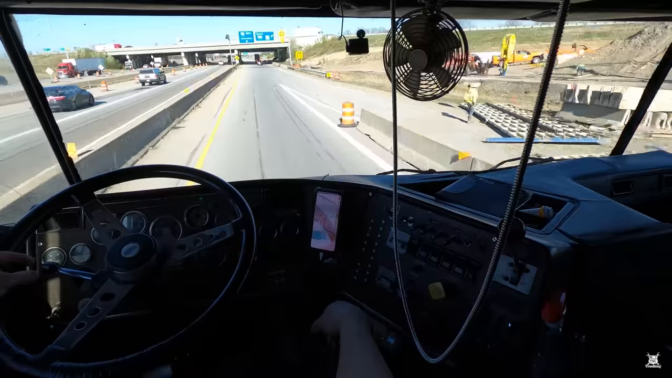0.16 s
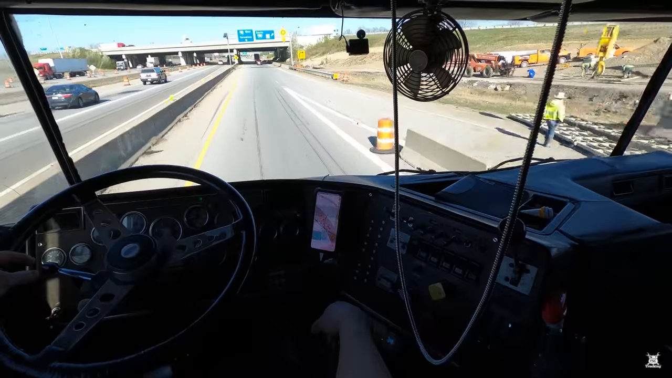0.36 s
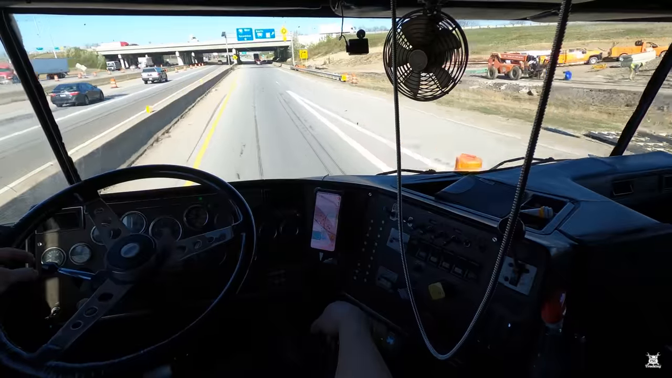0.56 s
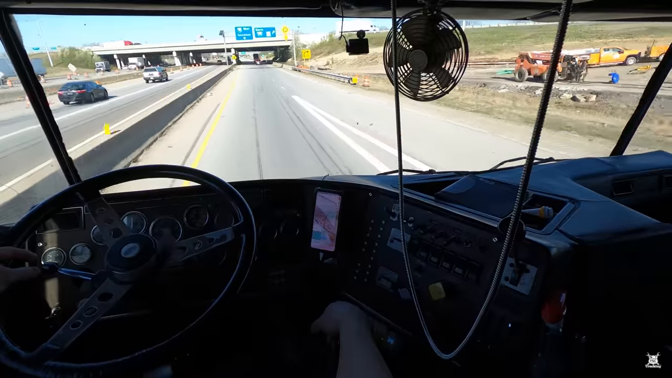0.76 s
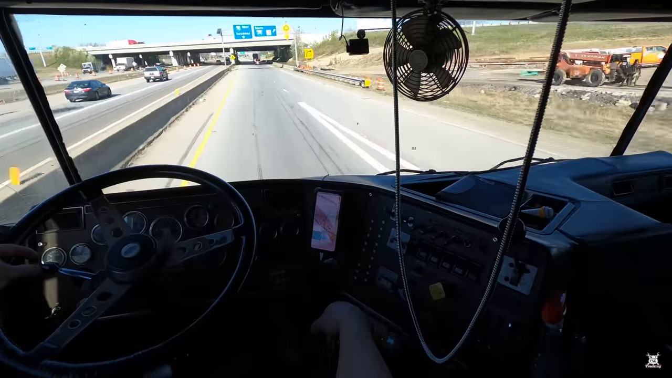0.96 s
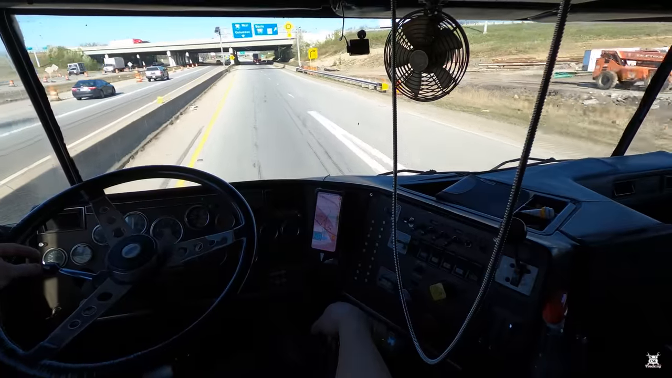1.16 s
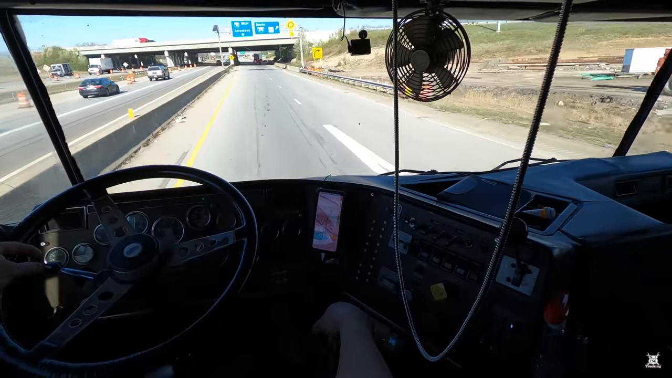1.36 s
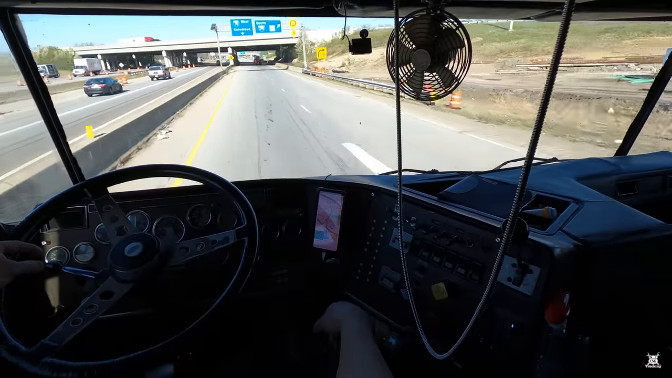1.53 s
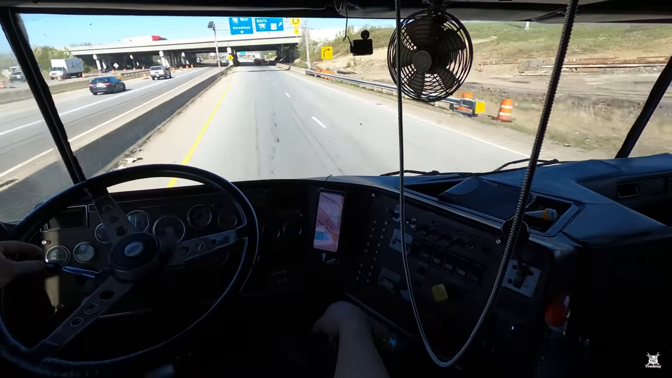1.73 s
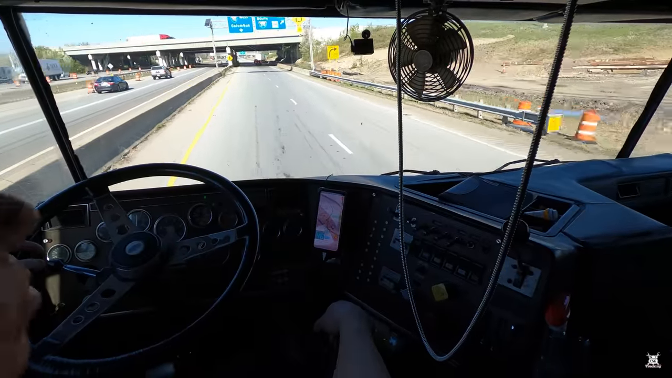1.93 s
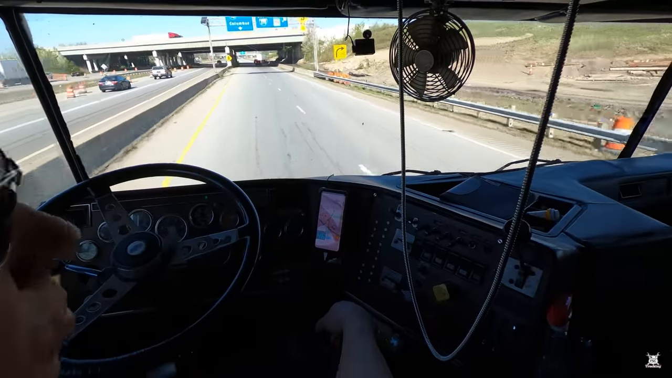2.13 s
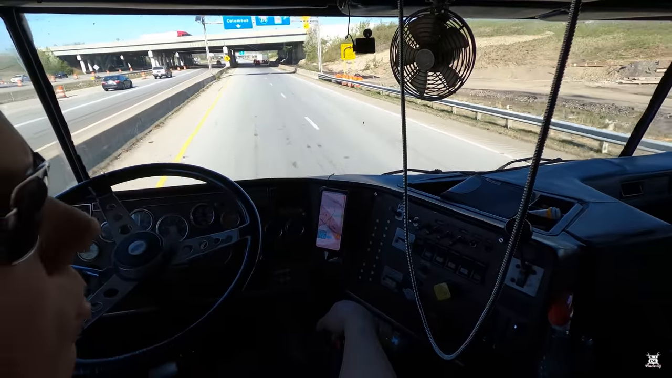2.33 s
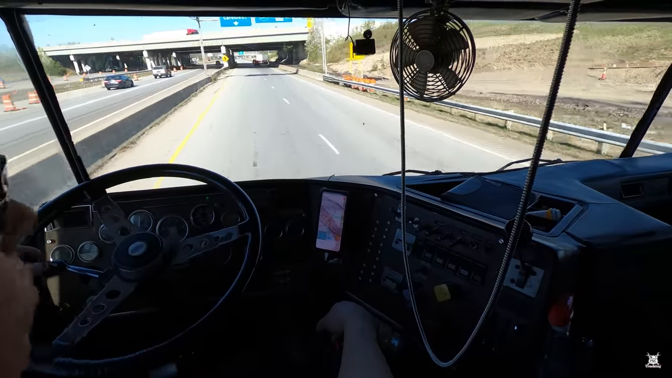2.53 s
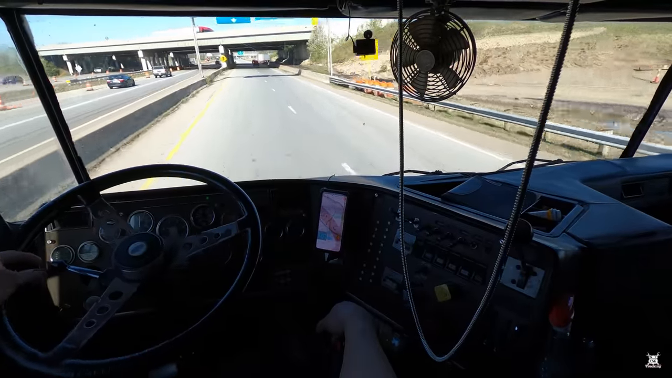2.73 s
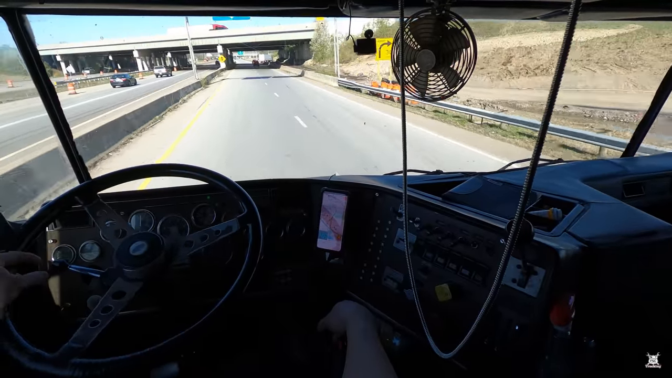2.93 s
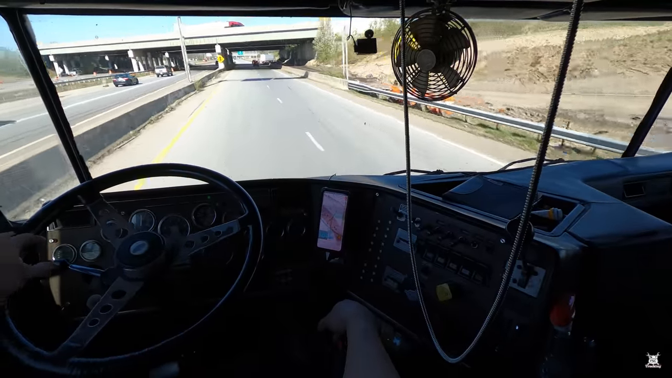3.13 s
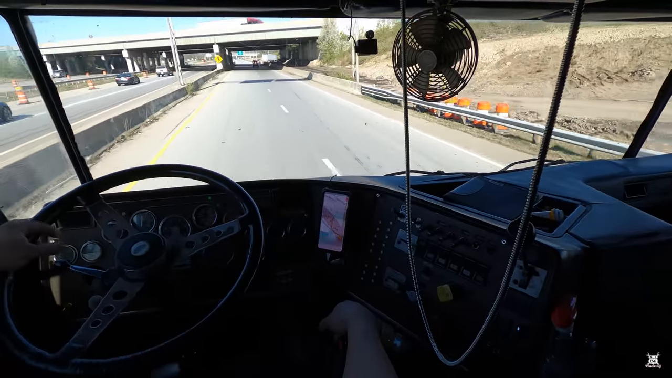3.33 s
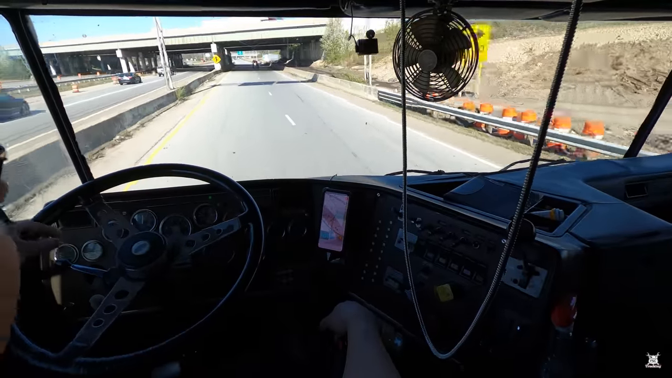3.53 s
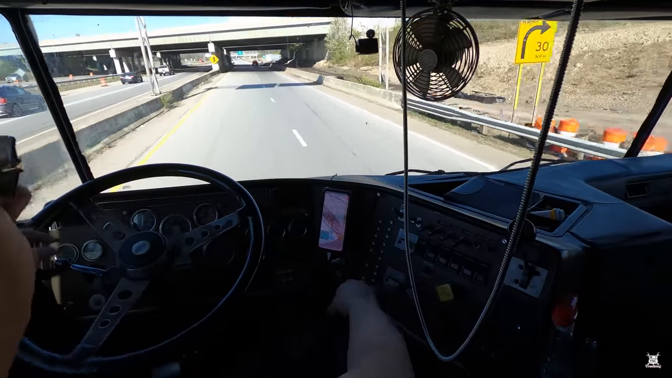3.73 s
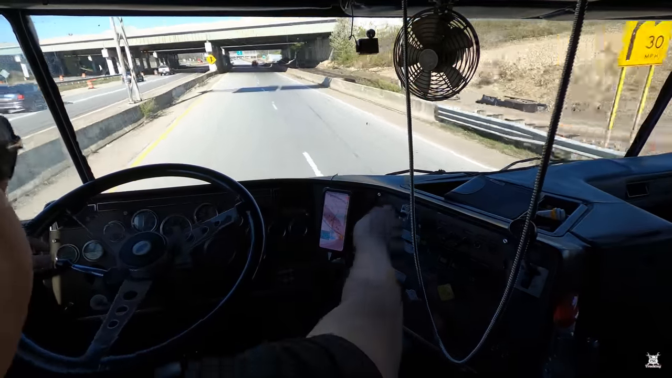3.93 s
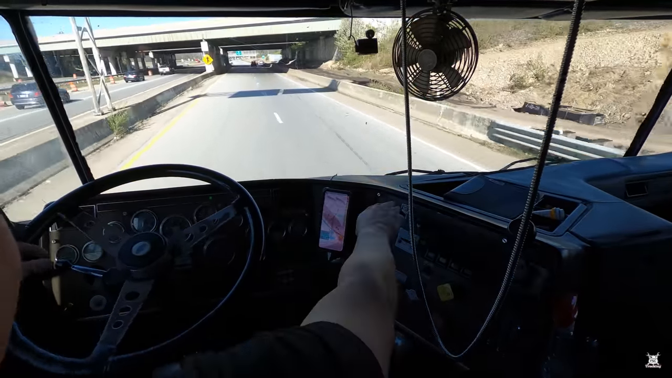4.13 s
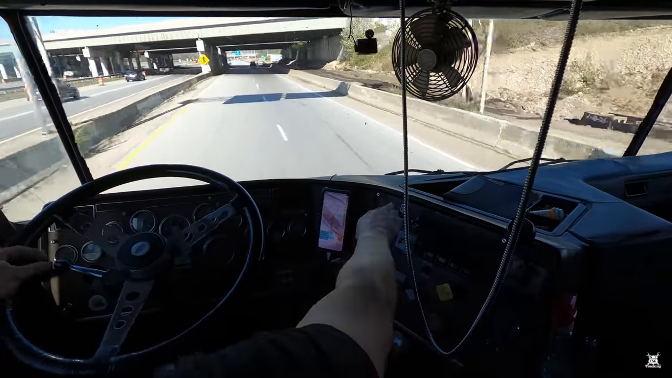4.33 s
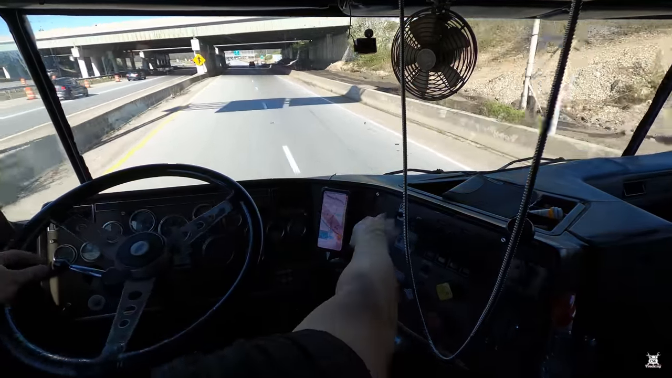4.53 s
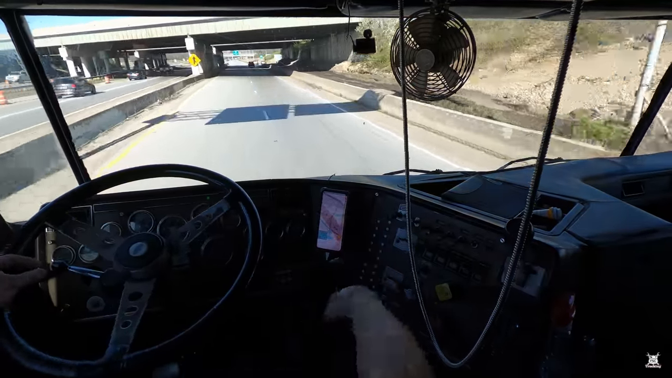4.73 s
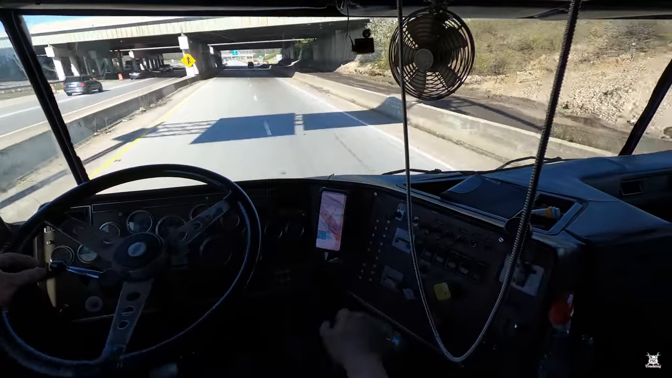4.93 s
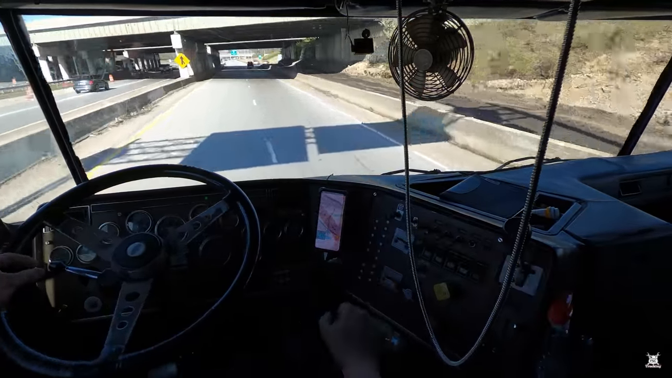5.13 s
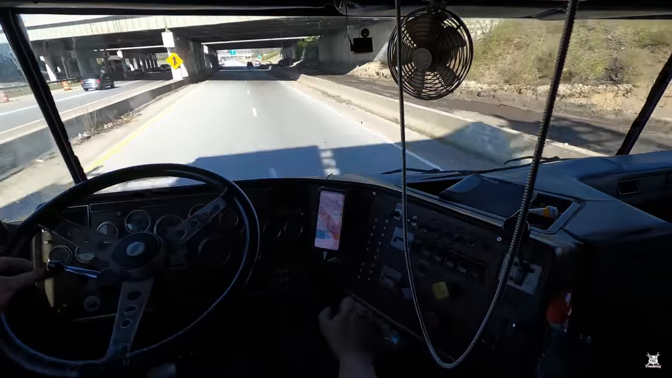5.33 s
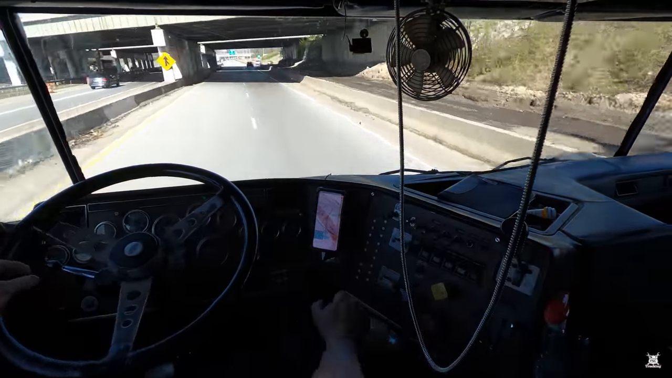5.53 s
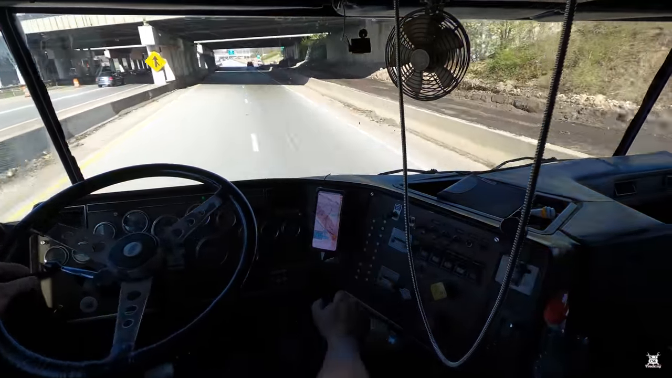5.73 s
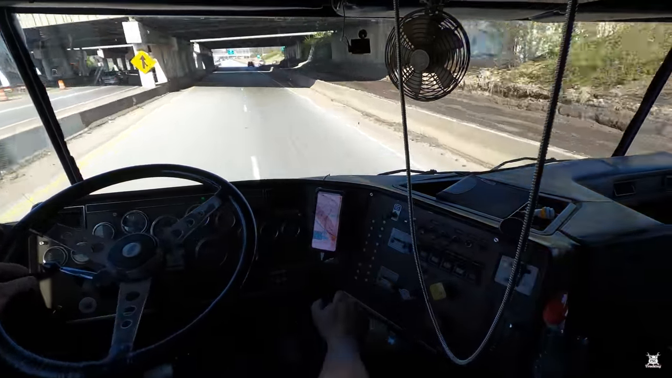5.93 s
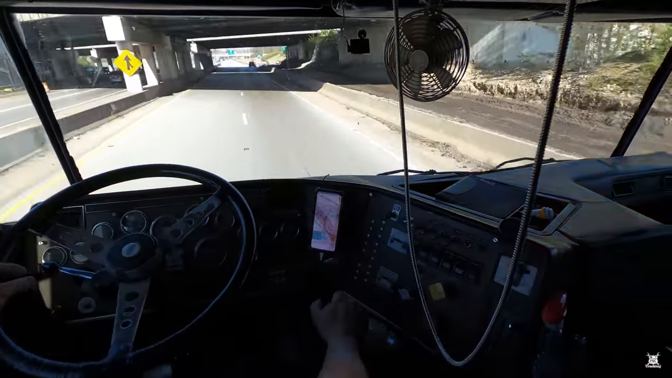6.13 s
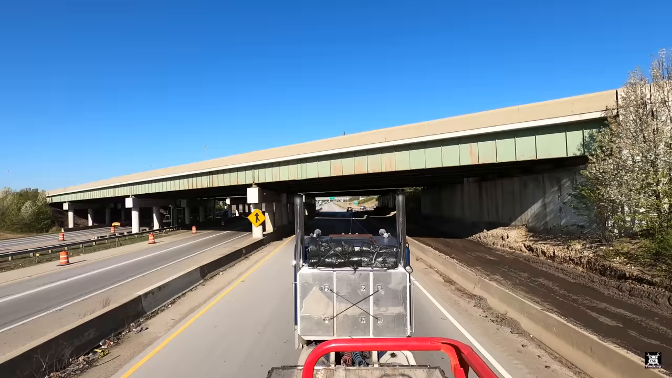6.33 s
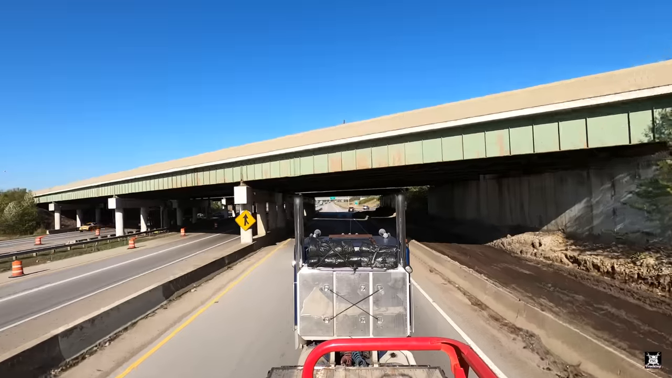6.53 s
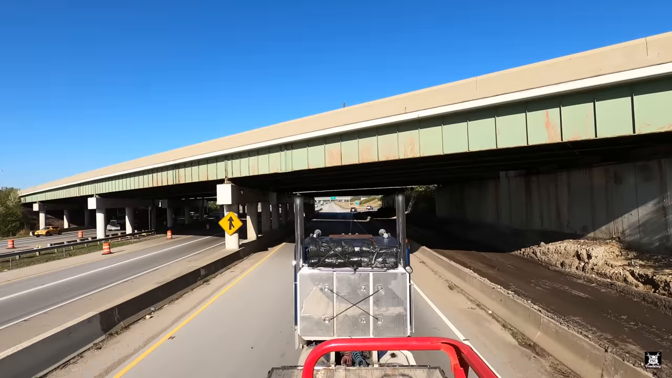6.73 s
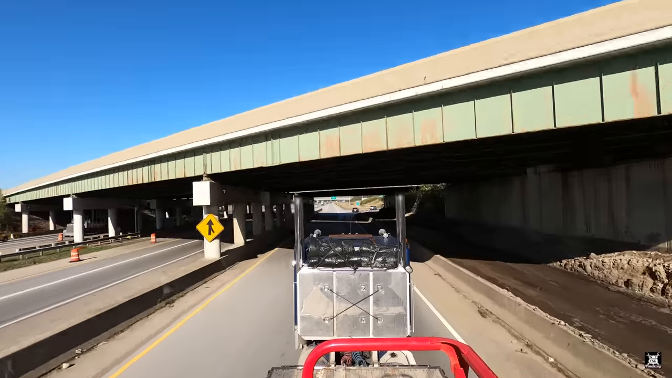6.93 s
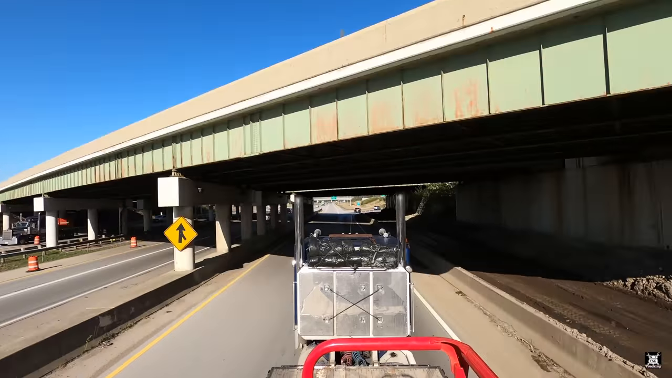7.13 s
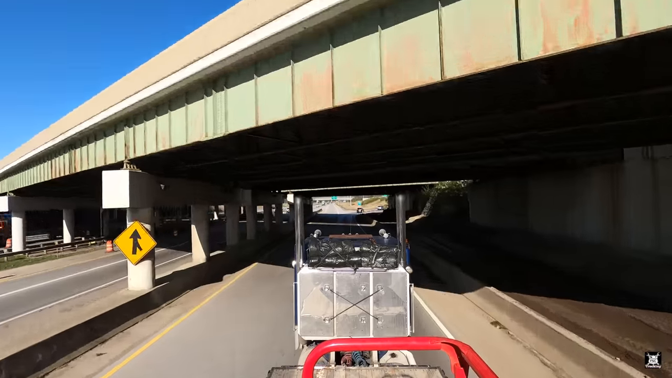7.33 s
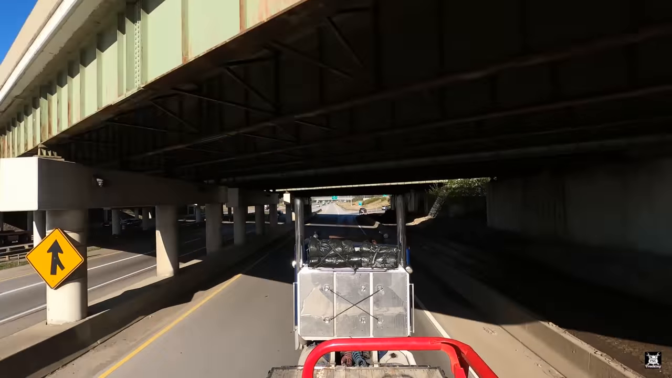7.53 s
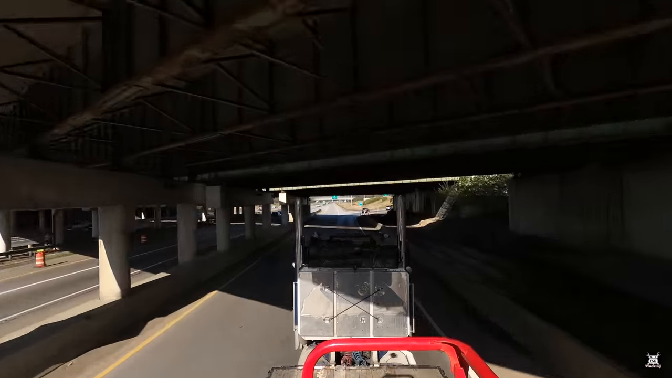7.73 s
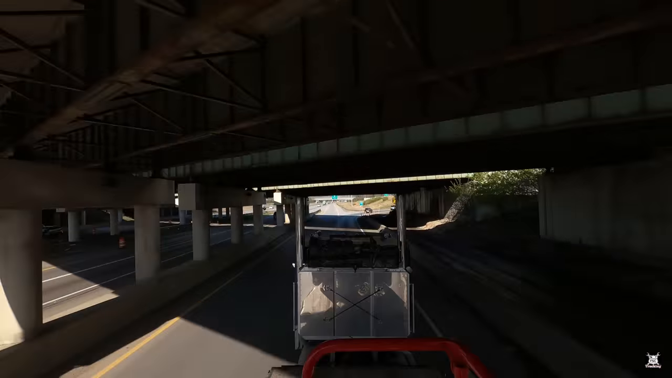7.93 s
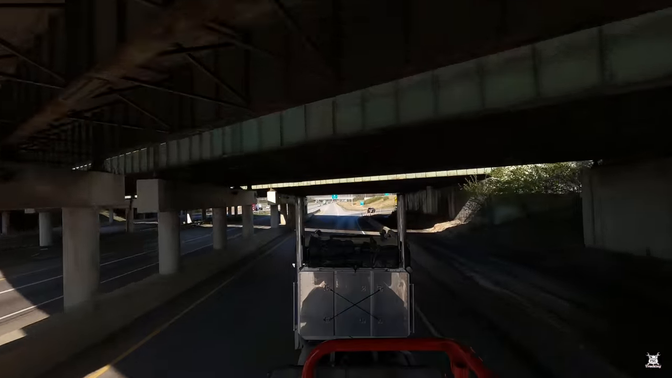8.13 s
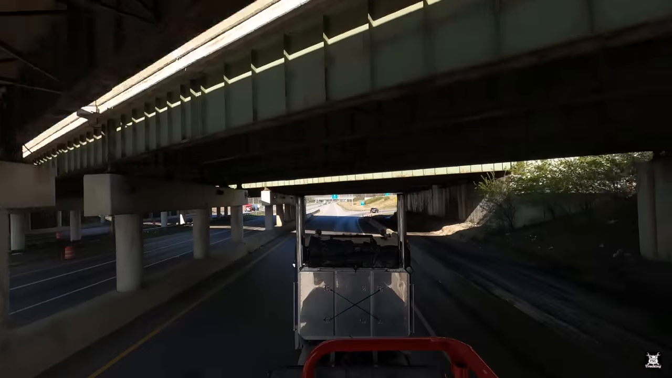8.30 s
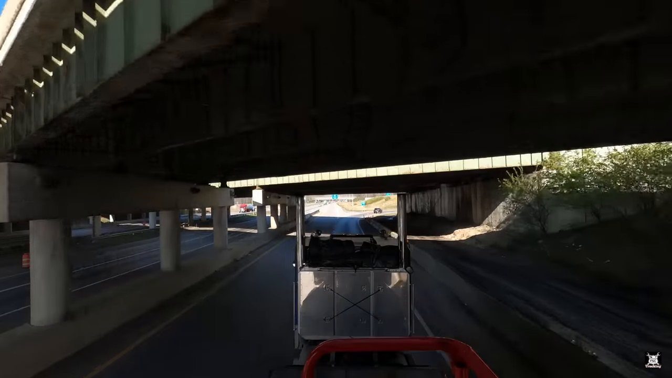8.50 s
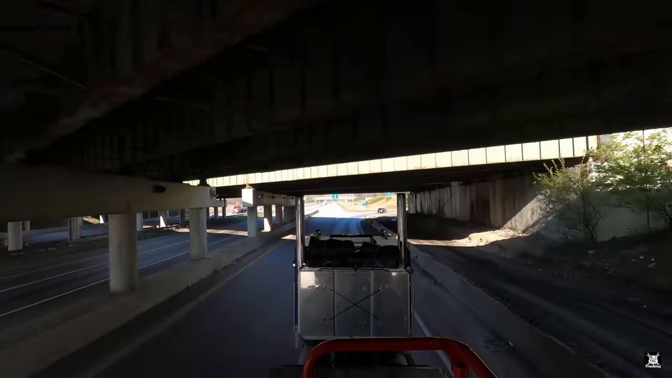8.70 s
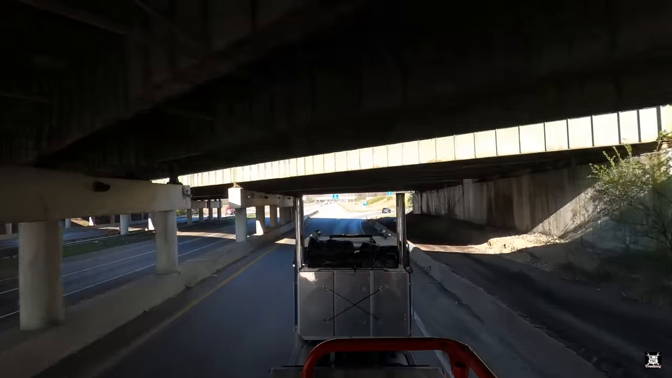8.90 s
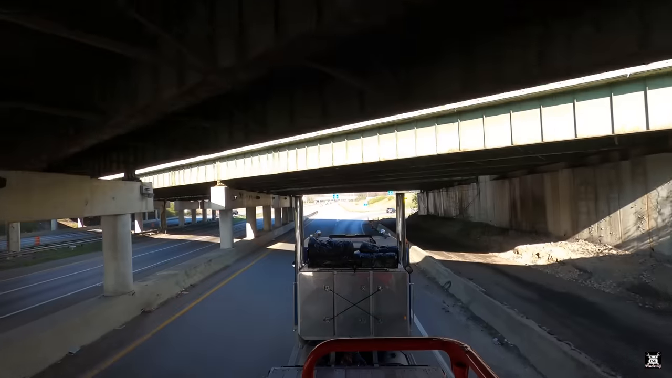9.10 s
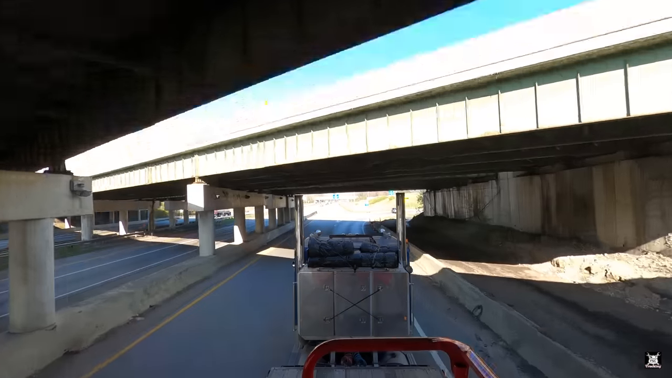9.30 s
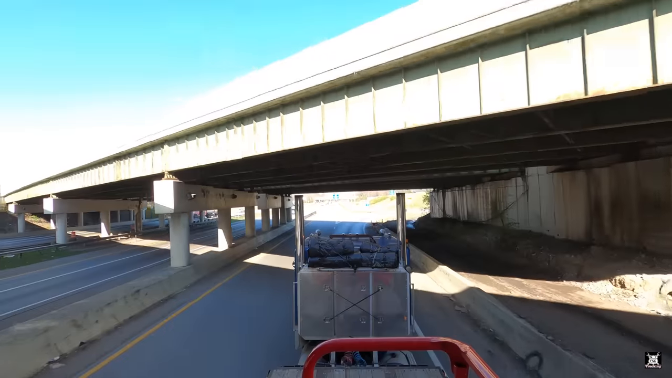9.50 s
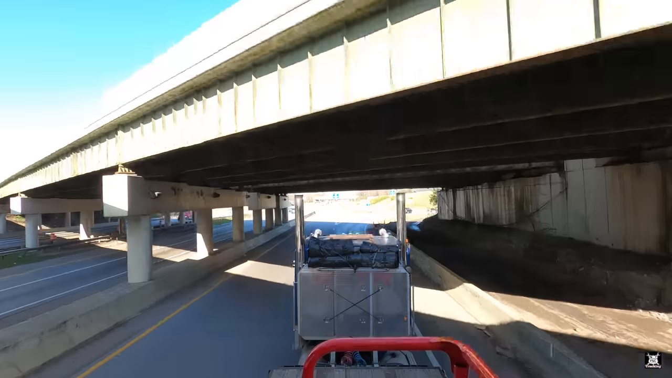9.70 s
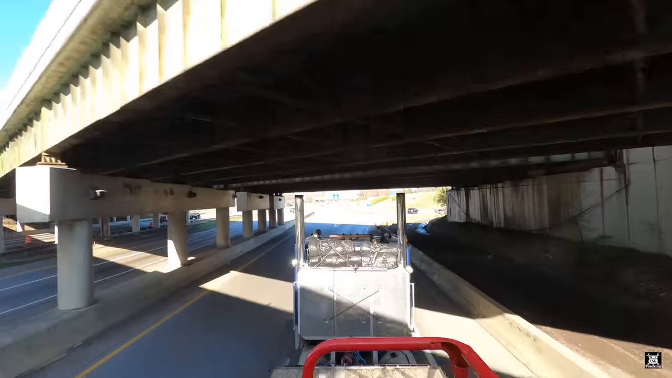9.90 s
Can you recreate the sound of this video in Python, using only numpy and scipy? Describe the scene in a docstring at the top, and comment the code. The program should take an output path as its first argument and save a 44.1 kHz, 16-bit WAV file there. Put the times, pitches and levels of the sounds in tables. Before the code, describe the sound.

A heavy diesel truck is heard from inside the cab, droning on its engine brake and slowly sinking in pitch over road noise, with a couple of faint knocks around 3 seconds. At 4.5 seconds a switch clicks twice and the braking ends with a soft thump. The engine drops lower and air hisses briefly at about 4.9 seconds for a gear change. Around 5.5 seconds the clutch bites with a shudder and a short panel rattle, and the engine climbs in pitch until nearly 7 seconds with a faint intake whine. Between 6.5 and 7.5 seconds the sound fades over to an outside microphone and grows much louder, with wind gusts and one sharp click. It peaks at 7.5 seconds as the truck enters an underpass, where a steady, resonant exhaust drone, tyre roar and rushing air continue until about 10 seconds.

```python
"""Diesel truck changing gear

A six-cylinder truck slows on its engine brake, heard in the cab, where the exhaust harmonics slide
through standing waves. A switch clicks, the brake stops, air hisses for a gear change and the engine
pulls up again. The sound then fades over to a microphone outside, where wind buffets, tyres roar
and the exhaust drones under a bridge, loud enough to overload it."""
import sys
import numpy as np
from scipy import signal
from scipy.fft import rfft, irfft, next_fast_len
from scipy.io import wavfile
from scipy.ndimage import uniform_filter1d

SR = 44100
rng = np.random.default_rng(int(sys.argv[2]) if len(sys.argv) > 2 else 0)


def master(y):
    """Save y as 16-bit WAV."""
    cut = np.clip(np.atleast_2d(y).T, -1, 1)
    pcm = np.round(cut * 32767)  # scale
    wavfile.write(sys.argv[1], SR, pcm.astype(np.int16))


N = 439236
TIME = np.arange(N) / SR
STEP = 16
COARSE = np.arange(N // STEP + 2) * STEP / SR  # a slower clock for bass and control curves
CYLINDERS = 6
CLUTCH_FADE_S, BRIDGE_FADE_S = 0.067, 0.093

# the engine slows on its brake, drops for the shift, pulls up and sags: (time [s], firing rate [Hz])
FIRING_RATE = [(0, 74.57), (1, 72.3), (1.5, 70.8), (3, 67.13), (4, 64.83), (4.55, 63.5), (4.8, 58.96),
               (5.05, 54.8), (5.2, 57.8), (5.45, 61.37), (5.75, 70.25), (5.95, 73.64), (6.2, 79.55),
               (6.45, 83), (6.75, 85.2), (7, 83.6), (7.4, 83.78), (8.1, 82.22), (8.7, 81.88), (9.1, 81.44),
               (9.5, 80.62), (9.96, 79.8)]
# off the brake the engine coasts, runs free, pulls and eases: (time [s], load [dB])
ENGINE_LOAD = [(4.6, -17), (4.95, -13), (5.12, -28), (5.4, -19), (5.55, -11), (5.85, -13), (6.05, -6.5),
               (6.4, -3.5), (6.78, -0.5), (6.9, -21)]
# bridges overhead: (entry time [s], exit time [s])
BRIDGE_SPANS = [(7.5, 9.33), (9.74, 10.4)]


def gain_of(db):
    """Decibels to amplitude."""
    return 10 ** (np.asarray(db) / 20)


def unit_rms(x):
    """Normalises to rms 1."""
    return x / np.sqrt(np.mean(x ** 2) + 1e-20)


def follow(rows, t=TIME):
    """Linear interpolation of each column of a time table at the times t."""
    times, *columns = np.transpose(rows)
    return [np.interp(t, times, column) for column in columns]


def fine(curve):
    """Interpolates a coarse-clock curve to every sample."""
    return np.interp(TIME, COARSE, curve)


def spectrum(points, hz):
    """Interpolates a spectrum table on a log-frequency axis."""
    f, db = np.transpose(points)
    return np.interp(np.log(hz + 1), np.log(f + 1), db)


def bell(hz, centre, width):
    """Gaussian frequency band of height 1."""
    return np.exp(-.5 * ((hz - centre) / width) ** 2)


def resonance(hz, centre, width):
    """Lorentzian resonance peak of height 1."""
    return 1 / (1 + ((hz - centre) / width) ** 2)


def lift(bands, hz):
    """Gain [dB] of a set of peaks and dips at the frequency hz."""
    return sum(db * bell(hz, centre, width) for centre, width, db in bands)


def ramp(t, at, fade):
    """Linear rise from 0 to 1 over fade seconds, centred on the time at."""
    return np.clip((t - at) / fade + .5, 0, 1)


def swell(t, at, half_length):
    """Gaussian envelope, down to 1/e a half length from its peak."""
    return np.exp(-((t - at) / half_length) ** 2)


def noise(colour):
    """Noise of rms 1 with the amplitude spectrum colour(hz)."""
    size = next_fast_len(N, True)
    white = rfft(rng.standard_normal(size))
    return unit_rms(irfft(white * colour(np.fft.rfftfreq(size, 1 / SR)), size)[:N])


def drift(rate):
    """Random modulation of rms 1 on the coarse clock, changing about rate times a second."""
    smooth = signal.resample(rng.standard_normal(512), 4096)
    return unit_rms(np.interp(COARSE * rate, np.arange(4096) / 8, smooth))


def braking(t, off_s=4.59, fade=0.15):
    """1 while the engine brake is on, then 0."""
    return 1 - ramp(t, off_s, fade)


def coasting(t, throttle_s=6):
    """1 between the end of braking and the throttle."""
    return (1 - braking(t)) * (1 - ramp(t, throttle_s, CLUTCH_FADE_S))


def clutch(t, start_s=5.47, end_s=5.78):
    """1 while the clutch bites."""
    return ramp(t, start_s, CLUTCH_FADE_S) - ramp(t, end_s, CLUTCH_FADE_S)


def outside(t, midpoint_s=6.93, fade=.2):
    """Logistic crossfade from the cab (0) to the outside microphone (1)."""
    return 1 / (1 + np.exp((midpoint_s - t) / fade))


def bridge_face(t):
    """Reflection from the face of the first bridge, swelling to 1 as the truck passes."""
    return swell(t, at=7.47, half_length=0.073)


def underpass(t):
    """1 once the truck is between the walls of the underpass."""
    return ramp(t, BRIDGE_SPANS[0][0], BRIDGE_FADE_S)


def overhead(t):
    """1 while a bridge deck is above the truck."""
    return sum(ramp(t, enter, BRIDGE_FADE_S) - ramp(t, leave, BRIDGE_FADE_S)
               for enter, leave in BRIDGE_SPANS)


def firing_count(wobble=.001):
    """Phase is the integral of frequency: firings so far at a slightly wavering crank speed."""
    rate = follow(FIRING_RATE, COARSE)[0] * (1 + wobble * drift(9))
    return np.cumsum(rate) * STEP / SR


def lope(line, midway_db, other_db, octave_db):
    """Unequal cylinders add lines between the firing harmonics; their relative level [dB]."""
    if line % CYLINDERS == 0:
        return 0
    base_db = other_db if line % (CYLINDERS // 2) else midway_db
    return min(0, base_db + octave_db * np.log2(line / CYLINDERS))


def cab_level(line, rate, midway_db=8.5, shudder_db=13.5, bass_hz=133.7,
              lope_db_per_hz=0.97, lope_from_hz=69.85):
    """Standing waves in the cab raise or sink an engine harmonic as it slides through them [dB]."""
    # engine spectrum in the cab: (frequency [Hz], level [dB])
    drone = [(55, -35.5), (62, -26.5), (68, -25.5), (100, -25.5), (200, -32.5), (400, -34.5), (500, -50),
             (560, -47), (700, -51.5), (900, -56.5)]
    # standing waves of the cab: (frequency [Hz], width [Hz], gain [dB])
    standing_waves = [(109.2, 7.3, 9.5), (125, 2.4, -9.5), (134.2, 3.9, 7.5), (144.6, 1.3, -8),
                      (148, 1.1, 8.5), (174.35, 5.25, 14.5), (193.7, 6, 9.5), (235, 16, 3),
                      (290, 17.4, -5.5), (312.8, 10.8, 15), (333.6, 7, -6.5), (366.8, 11.1, 10.5),
                      (415, 4.7, 2), (429.5, 5.9, 10), (468.5, 5.7, 11.5)]
    # change of engine tone off the brake: (frequency [Hz], gain [dB])
    power_tone = [(60, 2), (85, -0.5), (112, -7.5), (130, -2), (150, 6), (160, 9.5), (168, 6), (175, 2.5),
                  (198, -6), (255, 1.5), (320, -13.5), (450, -6)]
    hz, brake = rate * line / CYLINDERS, braking(COARSE)
    bass = 1 / (1 + (hz / bass_hz) ** 8)
    midway = line % CYLINDERS == CYLINDERS // 2  # halfway between two firing harmonics
    power_db = follow(ENGINE_LOAD, COARSE)[0] + midway_db * midway * bass + spectrum(power_tone, hz)
    db = spectrum(drone, hz) + lift(standing_waves, hz)
    db += lope(line, midway_db=-17, other_db=-18.5, octave_db=3.55)
    db += (1 - brake) * power_db + clutch(COARSE) * shudder_db * bass
    if line % CYLINDERS:  # on the brake the lope grows with speed
        db += brake * lope_db_per_hz * (rate - lope_from_hz)
    return db


def outside_level(line, rate, walls_db=2.5, boom_lag_s=0.067):
    """Reflection and standing waves in the underpass reinforce an engine harmonic outside [dB]."""
    # engine spectrum outside: (frequency [Hz], level [dB])
    drone = [(60, -23), (82, -20.5), (97, -23), (120, -19.5), (124.5, -13.5), (136, -18.5), (200, -22.5),
             (325, -32), (375, -27.5), (430, -26), (520, -40), (700, -46.5), (900, -53.5)]
    # standing waves of the underpass: (frequency [Hz], width [Hz], gain [dB])
    standing_waves = [(171.3, 4.83, 16), (364.3, 16.7, 12), (551, 5, 14), (714, 16, 10)]
    # boom thrown back by the bridge face: (frequency [Hz], width [Hz], gain [dB])
    face_boom = [(125, 10, 6.8)]
    hz = rate * line / CYLINDERS
    db = spectrum(drone, hz) + lope(line, midway_db=-10.5, other_db=-15.5, octave_db=1.24)
    db += underpass(COARSE) * (walls_db + lift(standing_waves, hz))
    return db + bridge_face(COARSE - boom_lag_s) * lift(face_boom, hz)


def exhaust(firings, top_line=68, bark_lead=0.1364, blow_spread=1.2, lope_spread=1.0, uneven_db=1.37):
    """Six blows a cycle form a Fourier series; outside, reflections scatter its phases."""
    rate, outdoors = follow(FIRING_RATE, COARSE)[0], outside(COARSE)
    firing_waver, lope_waver = 0.021 + 0.099 * outdoors, .16 + .02 * outdoors
    sound = 0
    for line in range(CYLINDERS - 1, top_line + 1):
        if line % CYLINDERS:  # one cylinder barks hardest, bark_lead of a firing ahead of the beat
            bark = np.pi / 2 + 2 * np.pi * bark_lead * line / CYLINDERS
            phase = bark + (lope_spread + outdoors) * rng.standard_normal() + lope_waver * drift(7)
            unsteady = (1 + lope_waver * drift(8)) * gain_of(uneven_db * rng.standard_normal())
        else:  # firing harmonics align: a sharp pressure dip in the cab, a looser push outside
            phase = np.pi * (1 - outdoors) + (blow_spread + outdoors) * rng.uniform(-1.02, 1)
            unsteady = 1 + firing_waver * drift(14)
        cab_power = (1 - outdoors ** 2) * gain_of(cab_level(line, rate)) ** 2
        outside_power = outdoors ** 2 * gain_of(outside_level(line, rate)) ** 2
        amplitude = np.sqrt(2 * (cab_power + outside_power)) * unsteady
        sound += amplitude * np.cos(2 * np.pi * line * firings / CYLINDERS + phase)
    return signal.resample_poly(sound, STEP, 1, window=("kaiser", 10))[:N]


def rush_colour(hz, t):
    """Resonances filter the rush in the cab, tyre bands shape it outside; scaled by its 500-2000 Hz power
    averaged over all bins."""
    # noise in the cab on the brake: (frequency [Hz], level [dB])
    cab_braking = [(25, -9), (55, -3), (85, 3), (120, 8.5), (200, 8.5), (270, 7.5), (360, 9), (470, 7.5),
                   (600, 1.3), (800, -1.5), (1000, -7), (2000, -15), (3500, -25), (6000, -37), (11000, -50),
                   (12300, -54), (13500, -76)]
    # noise in the cab off the brake: (frequency [Hz], level [dB])
    cab_pulling = [(25, -10.5), (55, 1), (100, 14.5), (200, 11.5), (300, 13), (450, 7), (700, 3.5),
                   (1000, -6), (1500, -9.5), (2000, -12), (3500, -22.5), (6000, -36.5), (11000, -51),
                   (12300, -54.5), (13500, -76)]
    # cab and engine-bay modes: (frequency [Hz], width [Hz], braking gain [dB], pulling gain [dB])
    modes = [(460, 17, 1, 2), (466.5, 8.4, 6, 4.5), (499, 12, -5, -5), (775, 18, 2.5, 4),
             (960, 57, -3, 2.5), (1253, 19, 6.5, 3.5), (1560, 73, -2.5, -2.5), (1820, 70, -0.5, 2.5),
             (2250, 26, -0.5, 2), (3600, 180, -0.5, -0.5), (4550, 130, -1, 1.5), (5050, 170, -2.5, 0.5),
             (5600, 260, 1.5, 2), (8500, 470, -0.5, -4.5), (9500, 500, 2.5, 3.5)]
    # noise outside: (frequency [Hz], level [dB])
    open_air = [(25, -3), (55, 4.5), (100, 7), (200, 10), (320, 8.5), (430, 8), (600, 4.5), (1100, -3.5),
                (1600, -12), (2400, -19), (2700, -17.5), (3000, -21), (3500, -21), (5500, -32),
                (7500, -40.5), (8300, -47), (10000, -55.5), (12500, -60), (15000, -73)]
    # tyre roar on the open road, two bands and a hollow: (frequency [Hz], width [Hz], gain [dB])
    tyre_roar = [(650, 59, 2.5), (890, 73, -3), (1150, 150, 4)]
    braking_db = spectrum(cab_braking, hz) + lift([(f, width, db) for f, width, db, _ in modes], hz)
    pulling_db = spectrum(cab_pulling, hz) + lift([(f, width, db) for f, width, _, db in modes], hz)
    cab_db = braking(t) * braking_db + (1 - braking(t)) * pulling_db
    outside_db = spectrum(open_air, hz) + (1 - overhead(t)) * lift(tyre_roar, hz)
    colour = gain_of((1 - outside(t)) * cab_db + outside(t) * outside_db)
    midrange = (hz > 500) & (hz < 2000)
    return colour / np.sqrt((colour ** 2 * midrange).mean(0))


def treble_shelf(hz, t, corner_hz=2200, cab_db=-1.5, coast_db=0.5, open_db=-1, bridge_db=1.06):
    """Bridge decks reflect the treble of the rush; coasting brightens it slightly too [dB]."""
    inside_db = cab_db + coast_db * coasting(t)
    outside_db = open_db + (bridge_db - open_db) * overhead(t)
    shelf_db = (1 - outside(t)) * inside_db + outside(t) * outside_db
    return shelf_db * hz ** 2 / (hz ** 2 + corner_hz ** 2)


def rush(firings, level_db=-.5, clutch_db=2.5, patchy_db=0.7, flicker_db=0.79,
         low_throb=0.15, high_throb=0.044, face_throb=0.35, split_hz=700):
    """Broadband road, wind and combustion noise, amplitude-modulated at the firing rate."""
    # midrange strength of the rush: (time [s], level [dB])
    levels = [(0, -32), (1.4, -33), (3.7, -39), (4.56, -39), (4.66, -41.5), (5.05, -37.5), (5.25, -35.5),
              (5.95, -34.5), (6.25, -31.5), (6.7, -29), (7.15, -22), (7.38, -20.5), (7.52, -19), (7.7, -22),
              (9.05, -21), (9.45, -23), (9.96, -21)]
    hz, t, frames = signal.stft(rng.standard_normal(N), SR, nperseg=2048, noverlap=1024)
    hz = hz[:, None]
    patches = uniform_filter1d(rng.standard_normal(frames.shape), size=16, axis=0)
    patches = unit_rms(uniform_filter1d(patches, size=4, axis=1))
    db = follow(levels, t)[0] + clutch_db * clutch(t) + treble_shelf(hz, t) + patchy_db * patches
    frames = frames * rush_colour(hz, t) * gain_of(db)
    sound = signal.istft(frames, nperseg=2048, noverlap=1024)[1][:N]
    lows = signal.sosfiltfilt(signal.butter(2, split_hz, fs=SR, output="sos"), sound)
    growl = high_throb + face_throb * bridge_face(TIME)
    throb = np.cos(2 * np.pi * fine(firings)) * (low_throb * lows + growl * (sound - lows))
    return (sound + throb) * fine(gain_of(level_db + flicker_db * drift(40)))


def tyres(hum_hz=237, second_hz=251, width=2.5, second_db=-5, outside_db=-23, deck_db=5, cab_db=-42):
    """Two close bands of tread hum beat: faint in the cab, loudest under the first bridge."""
    hum = noise(lambda f: resonance(f, hum_hz, width)
                + gain_of(second_db) * resonance(f, second_hz, width))
    first_deck = underpass(COARSE) - ramp(COARSE, BRIDGE_SPANS[0][1], BRIDGE_FADE_S)
    return hum * fine(gain_of(cab_db) + outside(COARSE) * gain_of(outside_db + deck_db * first_deck))


def panel():
    """Modal response of a loose trim panel to random excitation, at rms 1."""
    # panel modes: (frequency [Hz], width [Hz], level [dB])
    modes = [(1000, 110, 7), (1923, 190, -1), (2650, 180, -10), (3350, 170, -11)]
    return noise(lambda f: sum(gain_of(db) * resonance(f, hz, width) for hz, width, db in modes))


def trim_knocks():
    """Jolts from the road and the drive briefly excite the modes of the loose panel."""
    # knocks: (time [s], level [dB], half length [s])
    knocks = [(2.613, -43, .01), (3.275, -41.5, .012), (4.735, -45, .01), (4.986, -44, .01),
              (5.528, -35, 0.019), (5.567, -31, 0.0053), (5.68, -45, 0.0091), (5.717, -44, .01)]
    envelope = sum(gain_of(db) * np.exp(-abs(COARSE - at) / length) for at, db, length in knocks)
    return panel() * fine(envelope)


def clicks(tick_db=-11, ring_db=-6, tail_db=-15, tail_t60=0.17, rise_s=0.00027, detune=0.018):
    """Impacts of switches and small parts: a tick, damped metal modes and a wash of reflections."""
    # impacts: (time [s], level [dB], 60 dB decay time [s])
    impacts = [(2.771, -44, 0.08), (4.4657, -29.5, 0.053), (4.4955, -26.5, 0.045), (5.36, -45, 0.06),
               (7.136, -36, 0.05), (7.157, -22.5, .055)]
    # tick of the contact: (frequency [Hz], level [dB])
    contact = [(1500, -20), (2500, -2.5), (3200, 3), (4100, -6.5), (7400, -10), (8500, -15), (10500, -19),
               (13000, -25), (16000, -52)]
    # modes of a small metal part: (frequency [Hz], level [dB])
    modes = [(2890, -1), (3110, 0.5), (3520, -8), (4560, -14), (5260, -15), (6100, -17), (7350, -18),
             (9700, -25)]
    tick, sound = noise(lambda f: gain_of(spectrum(contact, f))), np.zeros(N)
    age = TIME[:SR // 4]
    attack, wash = 1 - np.exp(-age / rise_s), gain_of(tail_db - 60 * age / tail_t60)
    for at, db, t60 in impacts:
        span = round(at * SR) + np.arange(len(age))
        detuned = [(hz * (1 + detune * rng.standard_normal()), mode_db) for hz, mode_db in modes]
        ring = sum(gain_of(mode_db) * np.sin(2 * np.pi * hz * age) for hz, mode_db in detuned)
        decay = gain_of(-60 * age / t60)
        click = gain_of(ring_db) * ring * decay + gain_of(tick_db) * tick[span] * (decay + wash)
        sound[span] += gain_of(db) * attack * click
    return sound


def thumps(centre_hz=270, width=60):
    """A low resonance of the cab is jolted as the brake lets go and as the drive takes up."""
    # jolts: (time [s], level [dB], half length [s])
    jolts = [(4.565, -21, 0.03), (5.527, -28, 0.043)]
    body = noise(lambda f: resonance(f, centre_hz, width))
    return body * fine(sum(gain_of(db) * swell(COARSE, at, length) for at, db, length in jolts))


def fan(firings, per_firing=3.3, level_db=-31.5, waver=0.26):
    """The belt-driven fan's tone keeps a fixed ratio to the firing rate, heard in the cab under load."""
    load_db = follow(ENGINE_LOAD, COARSE)[0]
    level = gain_of(level_db + .5 * load_db) * (1 - braking(COARSE)) * (1 - outside(COARSE))
    tone = np.sqrt(2) * np.sin(2 * np.pi * per_firing * fine(firings))
    return tone * fine(level * (1 + waver * drift(12)))


def driveline(coast_hz=62, coast_db=-40, pull_hz=119.8, pull_db=-32, waver=.2):
    """Driveline vibration hums low while the truck rolls free, and higher under load."""
    pulling = ramp(COARSE, at=6.1, fade=.12) * (1 - outside(COARSE))
    hums = [(coast_hz, coast_db, coasting(COARSE)), (pull_hz, pull_db, pulling)]
    return sum(np.sqrt(2) * np.sin(2 * np.pi * hz * TIME)
               * fine(gain_of(db) * on * (1 + waver * drift(9.3))) for hz, db, on in hums)


def turbo(width=130):
    """The turbocharger's narrow-band whistle falls and rises in pitch with its rotor speed."""
    # run-down and spool-up: (time [s], frequency [Hz], level [dB])
    spool = [(4.7, 12700, -110), (5, 12300, -89), (5.6, 11500, -93), (6.3, 11260, -110), (7.6, 12380, -94),
             (8.4, 13750, -90), (9, 14380, -87), (9.96, 15220, -90)]
    hz, db = follow(spool)
    carrier = np.sqrt(2) * np.cos(2 * np.pi * np.cumsum(hz) / SR)
    return noise(lambda f: bell(f, 0, width)) * carrier * gain_of(db)


def air_valve():
    """A turbulent jet of compressed air puffs briefly as the gear changes."""
    # jet spectrum: (frequency [Hz], level [dB])
    jet = [(800, -20), (2000, 2), (3000, 6), (4500, -5), (6300, -3), (8300, -17), (9600, -12), (11500, -21),
           (14000, -40)]
    # envelope of the puff: (time [s], level [dB])
    flow = [(4.80, -80), (4.825, -48), (4.86, -48), (4.93, -49), (4.97, -57), (5.04, -61)]
    valve_open = (TIME > flow[0][0]) & (TIME < flow[-1][0])
    return noise(lambda f: gain_of(spectrum(jet, f))) * gain_of(follow(flow)[0]) * valve_open


def intake_whines(width=140):
    """Narrow bands of intake flow noise swell and fade, some gliding in pitch."""
    # whines: (time [s], level [dB], half length [s], frequency [Hz], glide [Hz/s])
    whines = [(5.25, -61, 0.35, 3000, 0), (5.703, -56, 0.055, 3740, -1500), (5.82, -58, .033, 3270, -1500),
              (5.72, -69, .16, 5550, -1600), (6.142, -66, .16, 5520, 1501), (6.152, -62, .18, 3480, 701),
              (6.37, -63, .08, 4510, 1), (6.6, -62, 0.084, 4520, 1)]
    fuzz, sound = noise(lambda f: bell(f, 0, width)), np.zeros(N)
    for at, db, length, hz, glide in whines:
        near = abs(TIME - at) < 3 * length
        t = TIME[near] - at
        carrier = np.sqrt(2) * np.cos(2 * np.pi * (hz + glide * t / 2) * t)
        sound[near] += carrier * fuzz[near] * gain_of(db) * swell(t, 0, length)
    return sound


def trim_buzz(firings, level_db=-37, decay_firings=0.13):
    """Forced vibration: while the clutch shudders, every firing shakes the loose panel."""
    shakes = np.exp(-(firings % 1) / decay_firings)
    return panel() * fine(gain_of(level_db) * clutch(COARSE) * shakes)


def wind(corner_hz=115, low_hz=50, buffet_db=-44, waver_db=2):
    """Turbulence presses on the outside microphone: a low, steady buffeting with gusts on top."""
    # gusts: (time [s], level [dB], half length [s])
    gusts = [(6.8, -27, 0.095), (7.0, -20.5, 0.086), (7.355, -21, 0.086), (7.48, -19.5, 0.07)]
    rumble = noise(lambda f: f ** 2 / (f ** 2 + low_hz ** 2) / (1 + (f / corner_hz) ** 3))
    surges = sum(gain_of(db) * swell(COARSE, at, length) for at, db, length in gusts)
    envelope = gain_of(buffet_db) * outside(COARSE) + surges
    return rumble * fine(envelope * gain_of(waver_db * drift(15)))


def squeaks(pitch_hz=9300, width=260, half_length_s=.008):
    """Two pulses of narrow-band noise make a tiny, high double squeak."""
    # pulses: (time [s], level [dB])
    pulses = [(6.755, -68), (6.775, -61)]
    tone = noise(lambda f: bell(f, pitch_hz, width))
    return tone * sum(gain_of(db) * swell(TIME, at, half_length_s) for at, db in pulses)


def wide_road():
    """Uncorrelated road noise, the difference between left and right, widens the sound at the end."""
    # spectrum of the side signal: (frequency [Hz], level [dB])
    colour = [(25, -27.5), (100, -11.5), (380, -14.5), (700, -20.5), (1300, -25.5), (2400, -28.5),
              (4400, -30.5), (8000, -47), (15000, -72)]
    # its growth: (time [s], level [dB])
    levels = [(0, -85.5), (6.3, -80), (6.8, -73), (8.7, -72), (9.2, -45.5), (9.6, -40.5), (9.96, -36.5)]
    return noise(lambda f: gain_of(spectrum(colour, f))) * gain_of(follow(levels)[0])


def thin_hiss(centre_hz=9500, width=2300, level_db=-62):
    """A high band of noise sets in as a thin hiss under the second bridge."""
    hiss = noise(lambda f: bell(f, centre_hz, width))
    return hiss * gain_of(level_db) * ramp(TIME, at=9.84, fade=.04)


def scene():
    """Superposition in mid-side stereo: all sits in the centre but the wide road noise."""
    firings = firing_count()
    engine = exhaust(firings) + fan(firings) + turbo() + driveline()
    road = rush(firings) + wind() + tyres() + thin_hiss()
    cab = (clicks() + trim_knocks() + trim_buzz(firings) + thumps()
           + air_valve() + squeaks() + intake_whines())
    centre, side = engine + road + cab, wide_road()
    return np.array([centre + side, centre - side])


def record(dry):
    """Soft saturation flattens the loudest crests; short end fades and a low-pass filter follow."""
    knee, cutoff_hz = .96, 15800
    excess = np.maximum(abs(dry) - knee, 0)
    clipped = np.sign(dry) * (abs(dry) - excess + (1 - knee) * np.tanh(excess / (1 - knee)))
    faded = clipped * signal.windows.tukey(N, .001)
    lowpass = signal.firwin(255, cutoff_hz, window=("kaiser", 9), fs=SR)
    return signal.oaconvolve(faded, lowpass[None], "same")


dry = scene()
out = record(dry)
master(out)
```